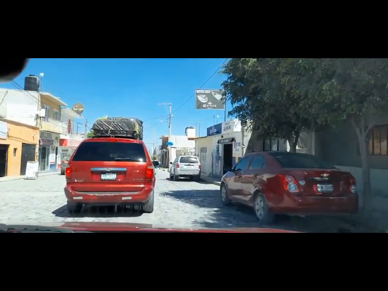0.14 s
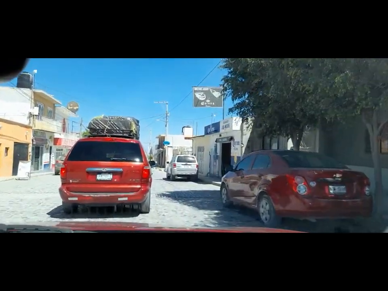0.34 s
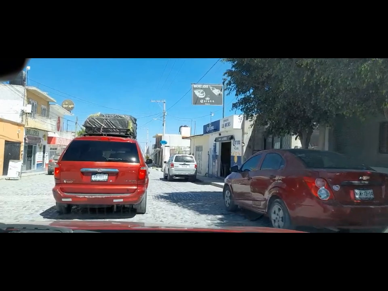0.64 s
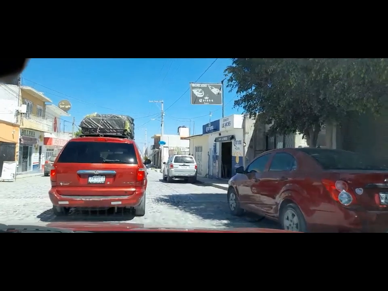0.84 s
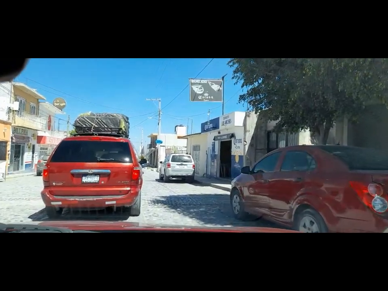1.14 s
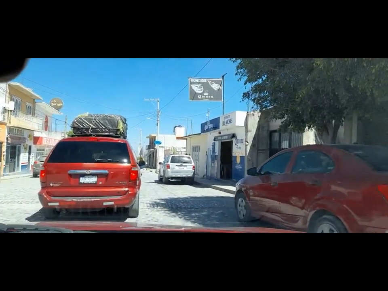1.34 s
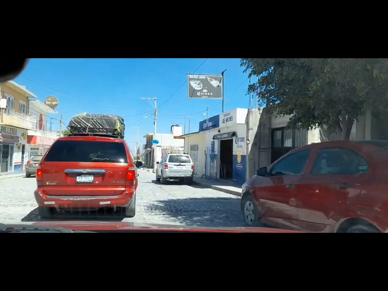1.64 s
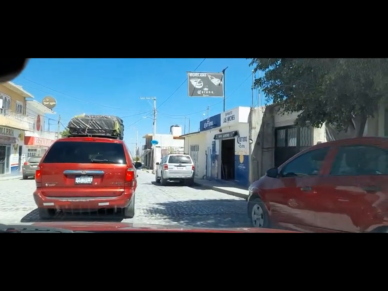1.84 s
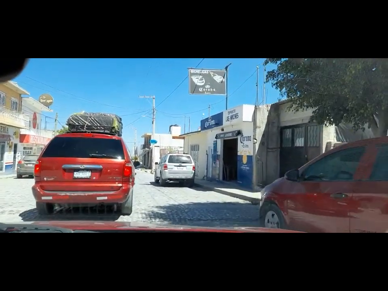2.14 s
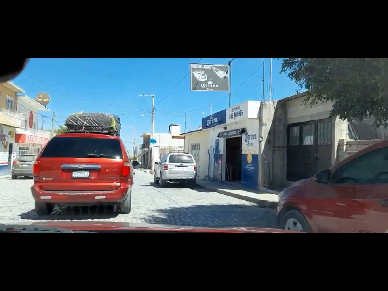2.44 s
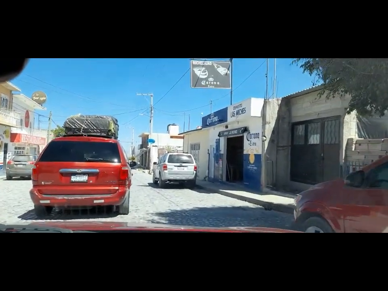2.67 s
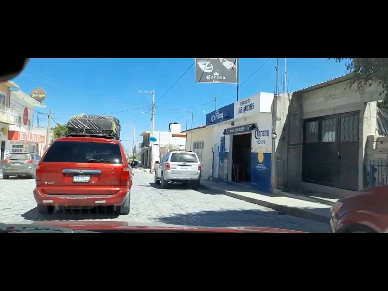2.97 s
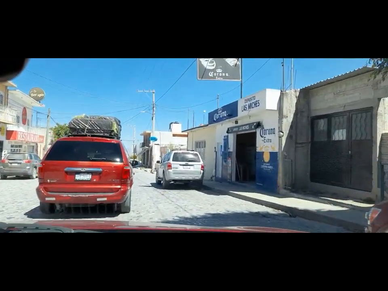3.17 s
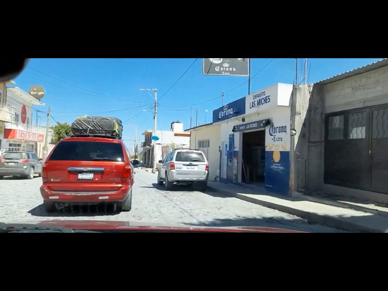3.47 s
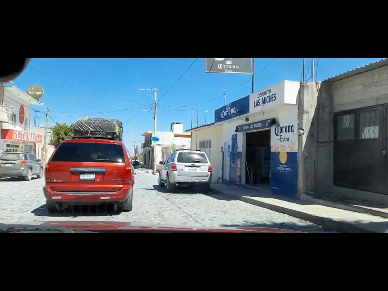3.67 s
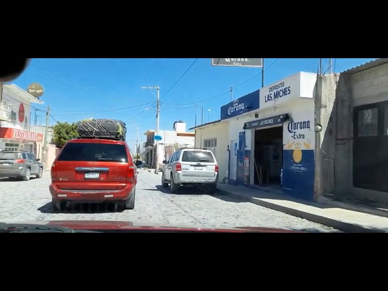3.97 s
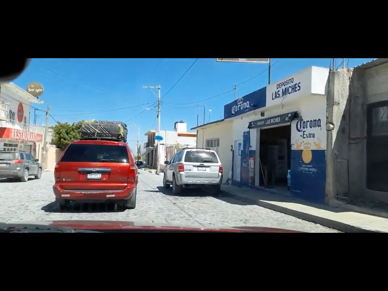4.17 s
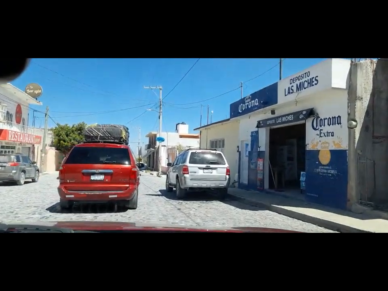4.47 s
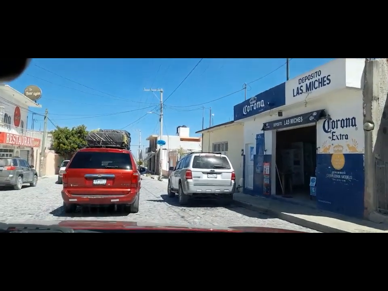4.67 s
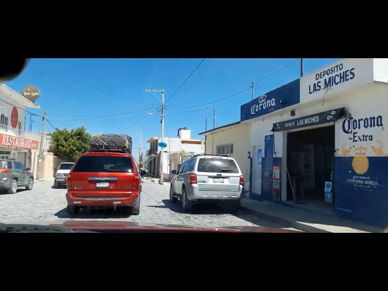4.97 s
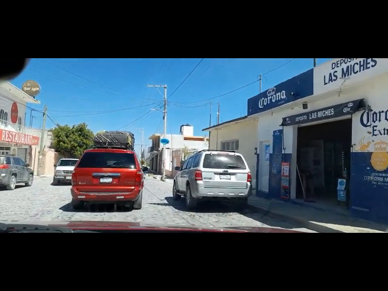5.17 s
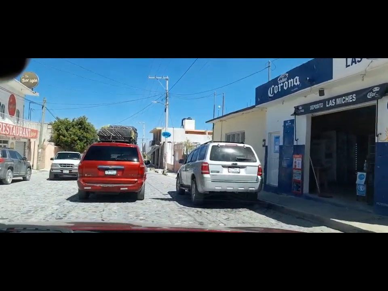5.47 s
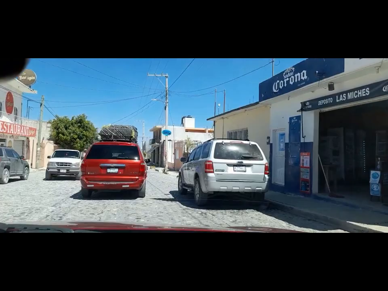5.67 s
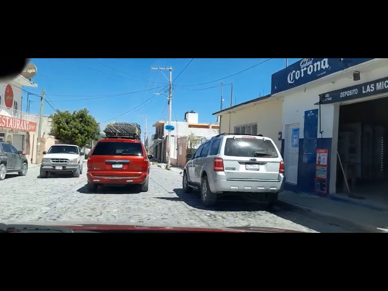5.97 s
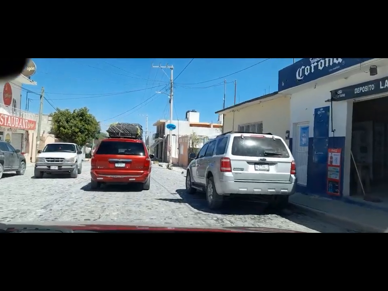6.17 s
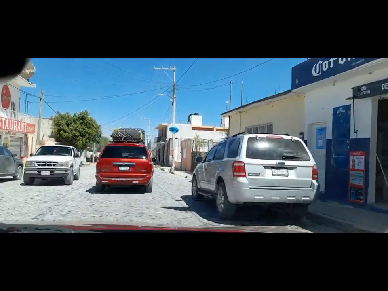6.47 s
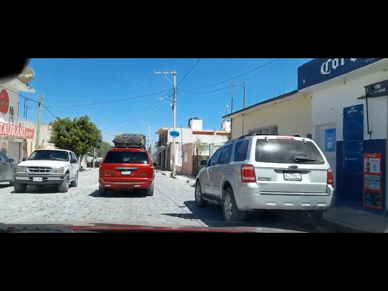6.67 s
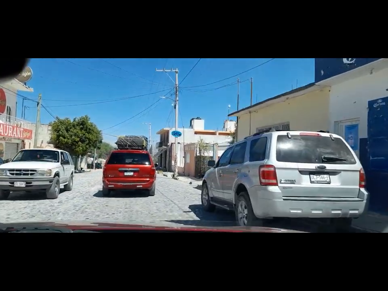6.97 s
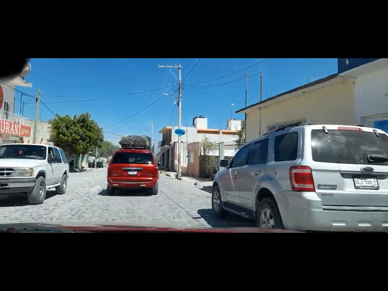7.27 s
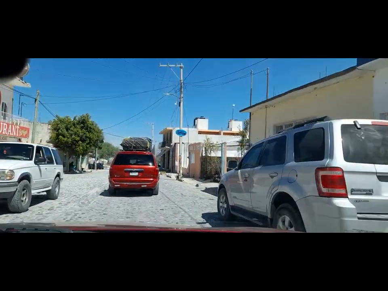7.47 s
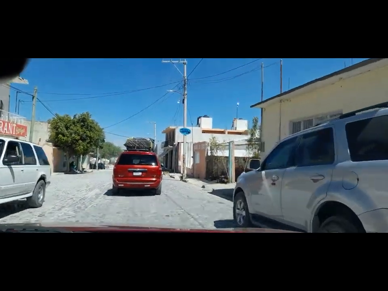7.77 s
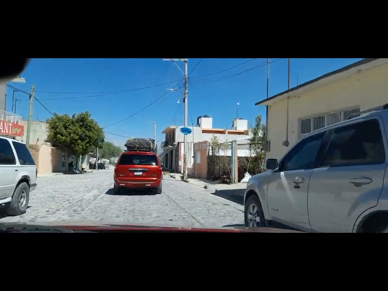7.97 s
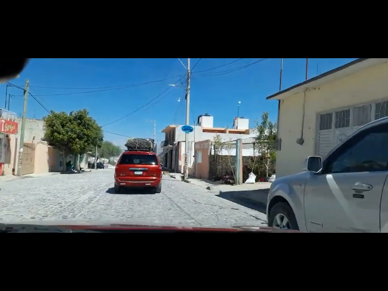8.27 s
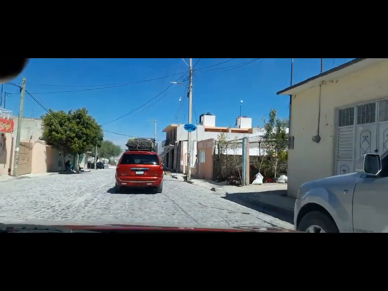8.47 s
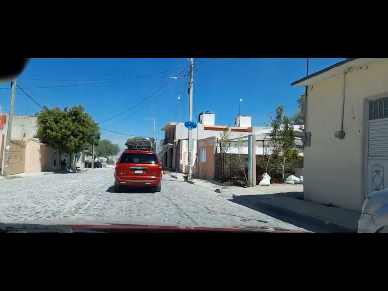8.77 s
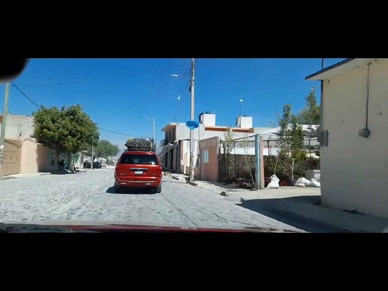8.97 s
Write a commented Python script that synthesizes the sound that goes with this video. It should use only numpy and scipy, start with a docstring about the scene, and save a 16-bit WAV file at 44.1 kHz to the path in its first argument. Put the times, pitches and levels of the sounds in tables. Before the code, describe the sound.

Inside a car rolling slowly over cobblestones, heard from the front seat. Throughout, a deep, bass-heavy drumming fills the cabin, with softer tyre roar, tiny trim chatter and faint hiss. A loose panel on the right knocks irregularly, clearly at 0.8 s; soft low bumps follow until 1.1. From about 1.2 to 2.4 s the engine growls and its low boom climbs in pitch, then lets go. Small knocks cluster around 3.0-3.3, and a second engine swell runs from 3.3 to 4.3. The rolling then calms. Around 5.7-6.1 several thuds arrive with gritty crunches and rattling. A strong panel knock at 7.2 leads into rougher jolts, plastic ticks on the left and sliding rustles. The hardest thump, with crunch and brief scrape, comes near 8.2. From 8.5 to the end at about 9 s, faint wavering squeaks and a rising rasp join the strong rumble.

```python
"""Inside a car rolling slowly over cobblestones. The stones drum through the suspension into the cabin,
a loose panel knocks, and plastic trim ticks and rustles on the jolts: ringing modes and short noise bursts.
The driver presses the pedal twice, so engine tones and noise puffs boom and growl briefly;
grainy noise crunches as grit under the tyres, and thin wavering tones make a faint squeal at the end."""
import sys
import numpy as np
from scipy import signal
from scipy.fft import rfft, irfft
from scipy.io import wavfile
from scipy.ndimage import uniform_filter1d

SR = 44100
rng = np.random.default_rng(int(sys.argv[2]) if len(sys.argv) > 2 else 0)


def unload_wav(signal):
    """Save mono or channel-first audio to the path in sys.argv[1] as 16-bit WAV at rate SR, clipped to [-1, 1]."""
    wavfile.write(
        sys.argv[1],
        SR,
        np.round(np.clip(np.atleast_2d(signal).T, -1, 1) * 32767).astype(np.int16),
    )


N = 402191
T, HZ = np.arange(N) / SR, np.fft.rfftfreq(N, 1 / SR)

# Levels in the colour tables only set the balance between pitches; each layer gets its loudness later.
# how alike left and right are: pitch_hz, likeness (1 same, 0 unrelated, -1 opposite)
LIKENESS = [(35, 1), (70, 0.75), (130, 0.99), (290, 0.61), (600, 0.28), (1200, -0.29), (3000, 0.068)]
# how much louder the left is than the right: pitch_hz, difference_db
LEFT_LEAN = [(30, 5), (70, 1.5), (140, -1), (300, 3), (550, 0), (1200, 1), (4300, 5), (7000, 13),
             (12000, 1.5)]
# steady hiss: pitch_hz, level_db (per Hz)
HISS_COLOUR = [(300, -7), (1000, 17), (2150, 1.5), (2700, -12.5), (5800, -4), (8300, -7.5), (11500, -1.5),
               (15500, -2)]
# chatter of tiny contacts: pitch_hz, level_db (per Hz)
CHATTER_COLOUR = [(900, -5), (2100, 3), (2750, -6), (3900, -4), (5900, -3.5), (6800, -9), (8300, -35),
                  (11500, -14.5), (15500, -16.5)]
# jolts that shake the whole dashboard: middle_s, length_s, rattle_db, rustle_db
JOLTS = [(2.698, 0.16, -54, -92), (6.066, 0.1, -50.5, -64), (7.375, 0.24, -52, -67.5),
         (7.628, 0.27, -58, -64), (7.875, 0.37, -53, -71.5), (8.21, 0.18, -54, -62.5)]
# rattle of the jolts, also used for the scrape: pitch_hz, level_db (per Hz)
JOLT_COLOUR = [(200, -12), (340, 4.5), (600, -8), (1200, -12.5), (2000, -14), (3000, -24.5), (6000, -28),
               (8000, -50.5)]
# thin, high rustles of something sliding by itself: middle_s, length_s, level_db
RUSTLES = [(0.51, 0.12, -59), (1.55, 0.48, -68), (2.27, 0.15, -66), (6.6, 2.1, -73), (9.05, 0.093, -63)]
# rustling: pitch_hz, level_db (per Hz)
RUSTLE_COLOUR = [(3000, -17.5), (6000, -3.5), (8300, -21), (10000, -7.5), (12000, -5.5), (15500, -9.5)]
# weak tones that join under the squeal: pitch_hz, level_db, join_s
WHINE_TONES = [(1050, -68.5, 8.83), (1105, -66.5, 8.64), (1338, -67, 8.84), (1468, -65.5, 9.0),
               (1615, -66, 8.97)]
# bursts of the high squeal: start_s, end_s, level_db (of the lower tone)
SQUEAL_BURSTS = [(8.552, 8.59, -66), (8.716, 8.75, -67.5), (8.822, 8.885, -66), (8.9, 8.94, -63),
                 (8.955, 8.995, -68.5), (9.008, 9.065, -64)]
# the two squeal tones: low_hz, high_hz
SQUEAL_PAIR = (1752, 1855)
# grit crunching under a tyre: start_s, level_db
CRUNCHES = [(2.703, -60), (4.163, -57.5), (5.995, -47), (6.058, -50), (7.327, -49), (7.41, -51),
            (7.797, -56), (8.131, -42.5)]
# grit: pitch_hz, level_db (per Hz)
GRIT_COLOUR = [(450, 2.5), (900, 1), (2200, -8), (2900, -18)]
# ticks of plastic trim: start_s, level_db, centre_hz (of the blow), spread_octaves
TICKS = [(0.589, -54, 5100, 0.37), (1.222, -48.5, 5800, 0.56), (2.025, -57, 2600, .7),
         (2.663, -58.5, 5000, 0.83), (5.173, -52.5, 5850, .13), (6.205, -56.5, 2370, .2),
         (7.583, -51.5, 13800, .25), (7.648, -49.5, 4800, 0.76), (8.011, -47.5, 4500, .4),
         (8.132, -54, 3600, .9), (8.216, -53, 6100, .15)]
# ringing modes of the trim: pitch_hz
TRIM_MODES = [2156, 2430, 2800, 3540, 4970, 5340, 5540, 5900, 6370, 11800, 13250]
# knocks of the loose panel, before a shared boost: time_s, level_db
KNOCKS = [(0.107, -42), (0.467, -40.5), (0.81, -28.5), (1.067, -39.5), (1.783, -41), (1.883, -40.5),
          (2.977, -41), (3.081, -33), (3.174, -36.5), (3.255, -36.5), (3.348, -39.5), (4.914, -40),
          (5.162, -38), (5.401, -38.5), (6.024, -43.5), (6.377, -33), (6.652, -37), (6.878, -43.5),
          (7.155, -27)]
# band of the dull clack of contact: low_hz, high_hz
CLACK_BAND = (250, 900)
# panel modes, before a small random detuning: pitch_hz, level_db, fade_s (to fall 60 dB)
PANEL_MODES = [(340, -1.5, 0.1), (465.3, -8, 0.14), (540, 4, 0.055), (710, -10.5, 0.015),
               (1040, -11.5, 0.043), (1310, -23, 0.05)]
# engine speed: time_s, firing_rate_hz
ENGINE_SPEED = [(1.25, 44.5), (1.4, 47.07), (1.64, 54.7), (1.92, 61.84), (2.07, 66), (2.2, 72.5),
                (2.39, 79.16), (2.5, 74.83), (3.32, 56.9), (3.6, 62.56), (3.94, 66.22), (4.09, 70.74),
                (4.28, 74), (4.4, 70.7)]
# presses of the pedal: down_s, up_s, growl_db, boom_db, intake_hiss_db
PRESSES = [(1.236, 2.369, -41, -22, -72), (3.32, 4.254, -41.5, -22.5, -80)]
# exhaust tones: order (multiple of the firing rate), level_db
EXHAUST_ORDERS = [(1, 5), (2, -12.5), (3, -21), (4, -27.5), (5, -26), (6, -26.5), (7, -28)]
# cabin resonances that the exhaust tones sweep through: pitch_hz, gain_db
CABIN_GAIN = [(45, -2.5), (54, -9.5), (64, -3), (78, -1), (100, -7), (125, -7), (145, 6.5), (170, -11.5),
              (200, -1.5), (330, -1.5), (370, -11.5), (420, 3), (480, -2.5), (560, -10.5)]
# engine growl: pitch_hz, level_db (per Hz)
GROWL_COLOUR = [(130, -3.5), (220, -0.5), (300, 2), (375, -0.5), (440, 4.5), (520, -4.5), (640, -14.5),
                (820, -11.5), (950, -24), (2400, -33.5)]
# wheels dropping off high stones: start_s, level_db, hardness_db_per_octave
BUMPS = [(0.822, -15, -9.5), (1.024, -20.5, -1.5), (1.135, -14, -13), (5.724, -20, -5.5),
         (5.945, -18.5, -4), (6.01, -29, 3.5), (6.056, -24.5, 5.5), (6.088, -20.5, 0), (7.312, -15.5, -4),
         (7.79, -26, 4.5), (8.175, -22, 4), (8.247, -11.5, -1), (8.323, -18, -8.5)]
# chassis modes, before random detuning: pitch_hz, level_db, fade_s (to fall 60 dB)
CHASSIS_MODES = [(57.7, 5.5, 0.2), (81.6, -0.5, 0.36), (130.6, -1.5, 0.24), (234, -6.5, 0.097),
                 (333, -12.5, 0.1), (403, -20, 0.074)]
# how hard the stones shake the car; boom, tyre roar and chatter follow it: time_s, level_db
ROUGHNESS = [(0, 3.5), (0.55, -1.5), (1.18, 2), (1.28, -2), (1.45, 0.5), (2.4, -2.5), (2.9, -2),
             (4.7, -0.5), (5.27, -3.5), (5.9, -0.5), (7.15, 1), (7.45, 3.5), (8.03, 2.5), (8.36, 5),
             (8.51, 2.5), (9.05, 5)]
# drumming body: pitch_hz, level_db (per Hz)
BOOM_COLOUR = [(20, -32), (26, -21.5), (31, -5.5), (38, -2.5), (50, 2), (62, 1), (78, 2), (100, -2),
               (135, -6.5), (165, -18.5), (260, -26)]
# roaring tyres: pitch_hz, level_db (per Hz)
ROAR_COLOUR = [(150, -11), (183, -1), (210, -10.5), (270, -9.5), (326, -8), (380, -14), (450, -14),
               (560, -19), (640, -26), (800, -27), (1280, -38), (2150, -44), (2750, -58)]

# the growl answers the pedal first, the boom builds after it
GROWL_RISE_S, BOOM_RISE_S, RELEASE_S = 0.087, 0.34, 0.15


def gain_of(db):
    """Turns decibels into amplitude."""
    return 10 ** (np.asarray(db) / 20)


def evened(x):
    """Scales a sound to an average strength (rms) of 1."""
    return x / np.sqrt(np.mean(x ** 2) + 1e-20)


def read(points):
    """Reads a table at every frequency, joining its points on a log axis."""
    hz, value = np.transpose(points)
    return np.interp(np.log(HZ + 1), np.log(hz + 1), value)


def coloured(x, points, skirt_db=30):
    """Filters by a table that falls by skirt_db an octave beyond its ends, then evens the result."""
    inside_hz = np.clip(HZ + 1, points[0][0], points[-1][0])
    octaves_outside = abs(np.log2((HZ + 1) / inside_hz))
    return evened(irfft(rfft(x) * gain_of(read(points) - skirt_db * octaves_outside), N))


def noise():
    """Unrelated white noise for two channels."""
    return rng.standard_normal((2, N))


def wander(rate_hz):
    """Slow random drift with an rms of 1."""
    t = np.arange(N // 32 + 1) * 32 / SR  # coarse steps are enough for a slow drift
    hz = np.fft.rfftfreq(len(t), t[1])
    spectrum = rfft(rng.standard_normal(len(t))) / (1 + (hz / rate_hz) ** 4)
    return evened(np.interp(T, t, irfft(spectrum, len(t))))


def panned(db):
    """Left and right gains that make the left louder by db."""
    return gain_of(np.array([[.5], [-.5]]) * db)


def cabin(pair):
    """Blends two unrelated signals into a field with the cabin's likeness and lean between the sides."""
    a, b = rfft(pair)
    same = np.clip(read(LIKENESS), -1, 1)
    mid, side = np.sqrt(1 + same) * a, np.sqrt(1 - same) * b
    return irfft(np.array([mid + side, mid - side]) * panned(read(LEFT_LEAN)), N)


def add(mix, s, sound):
    """Mixes a sound in at a time in seconds."""
    part = mix[..., max(round(s * SR), 0):][..., :sound.shape[-1]]
    part += sound[..., :part.shape[-1]]


def patter(per_s, spread_db, t60):
    """Envelope of random blows of uneven size, each falling 60 dB in t60 seconds."""
    sizes = gain_of(spread_db * np.minimum(rng.exponential(1, N), 4))
    blows = sizes * (rng.random(N) < per_s / SR)
    power = signal.lfilter([1], [1, -gain_of(-120 / (t60 * SR))], blows ** 2)
    return evened(np.sqrt(power))


def swells(rows):
    """Envelope of soft-edged bursts."""
    return sum(gain_of(db) * np.exp(-abs(2 * (T - s) / length) ** 3 * 2) for s, length, db in rows)


def shaking(follow):
    """Gain of a layer that follows the roughness of the road by this many dB per dB."""
    return gain_of(follow * np.interp(T, *np.transpose(ROUGHNESS)))


def pedal(down, up, rise_s):
    """Engine load from 0 to 1: it builds, holds and lets go."""
    return np.clip((T - down) / rise_s, 0, 1) * np.clip(1 - (T - up) / RELEASE_S, 0, 1)


def thin_tone(hz):
    """A wavering, fluttering tone that reaches the two sides out of step."""
    waver_hz, flutter_db = 13, 3
    turns = np.cumsum(hz + waver_hz * wander(25)) / SR + rng.random((2, 1)) / 4
    return np.sqrt(2) * np.cos(2 * np.pi * turns) * gain_of(flutter_db * wander(60))


def fittings():
    """Tiny contacts chatter with road and engine, rattle on jolts and rustle as they slide, over a hiss."""
    chatter_db, chatter_follow, hiss_db, buzz_db = -69.0, 0.94, -68.0, -73
    unrest, rustle_flutter = 0.48, .15  # shares of the level that vary
    contacts = evened(1 - unrest + unrest * patter(per_s=110, spread_db=3.3, t60=0.1))
    chatter = coloured(cabin(noise() * contacts), CHATTER_COLOUR)
    rattle = coloured(cabin(noise() * patter(per_s=600, spread_db=1.5, t60=0.04)), JOLT_COLOUR)
    rustle = coloured(noise() * (1 + rustle_flutter * wander(60)), RUSTLE_COLOUR) * panned(1.5)
    buzz = gain_of(buzz_db) * sum(pedal(down, up, GROWL_RISE_S) for down, up, *_ in PRESSES)
    drive = np.hypot(gain_of(chatter_db) * shaking(chatter_follow), buzz)
    jolts = swells((s, length, db) for s, length, db, _ in JOLTS)
    sliding = swells(RUSTLES) + swells((s, length, db) for s, length, _, db in JOLTS)
    hiss = gain_of(hiss_db) * coloured(noise(), HISS_COLOUR)
    return chatter * drive + rattle * jolts + rustle * sliding + hiss


def whine():
    """Faint thin tones join one by one under the squeal, while a noisy rasp swells."""
    join_s, rasp_db, rasp_db_per_s, rasp_full_s = .04, -58, 35, 9.15
    tones = sum(thin_tone(hz) * gain_of(db) * np.clip((T - join) / join_s, 0, 1)
                for hz, db, join in WHINE_TONES)
    rasp = coloured(cabin(noise()), CHATTER_COLOUR)
    return tones + rasp * gain_of(rasp_db - rasp_db_per_s * np.maximum(rasp_full_s - T, 0))


def squeal():
    """Something rubs, catches and lets go: each burst sings on a close pair of tones."""
    attack_s, release_s, upper_db = 0.0067, .016, -2
    bursts = np.zeros(N)
    for start, end, db in SQUEAL_BURSTS:
        fade_in = np.clip((T - start) / attack_s, 0, 1)
        fade_out = np.clip(1 - (T - end) / release_s, 0, 1)
        bursts += gain_of(db) * fade_in * fade_out
    low, high = (thin_tone(hz) for hz in SQUEAL_PAIR)
    return (low + gain_of(upper_db) * high) * bursts


def scrape():
    """A tyre scrapes off a stone's side in many small jerks, swelling to a peak and dying away."""
    peak_s, peak_db, rise_db_per_s, fall_db_per_s = 8.216, -43, 130, 150
    slips = coloured(cabin(noise() * patter(per_s=400, spread_db=1.5, t60=.04)), JOLT_COLOUR)
    below_db = np.maximum(rise_db_per_s * (peak_s - T), fall_db_per_s * (T - peak_s))
    return slips * gain_of(peak_db - below_db)


def grit():
    """Grit breaks under the tyres in short, grainy crunches."""
    crunch_t60 = .075  # seconds to fall 60 dB
    grains = coloured(cabin(noise() * patter(per_s=500, spread_db=3, t60=.012)), GRIT_COLOUR)
    t, crunches = np.arange(SR // 2) / SR, np.zeros(N)
    for s, db in CRUNCHES:
        add(crunches, s, gain_of(db - 60 * t / crunch_t60))
    return grains * crunches


def ticks():
    """Trim on the left snaps: a short crack, and the modes ring that lie near the centre of the blow."""
    ring_t60, crack_t60, crack = .042, 0.037, 0.58  # s, s, share of the ring
    t, out = np.arange(SR // 5) / SR, np.zeros((2, N))
    hz, mode_hz = np.fft.rfftfreq(len(t), 1 / SR) + 1, np.array(TRIM_MODES)[:, None]
    for s, db, centre_hz, spread in TICKS:
        def reach(f):
            """How strongly the blow excites a frequency."""
            return np.exp(-(np.log2(f / centre_hz) / spread) ** 2 / 2)
        phase = rng.random((2, len(mode_hz), 1))
        modes = reach(mode_hz) * np.sin(2 * np.pi * (mode_hz * t + phase))
        ring = evened(modes.sum(1)) * gain_of(-60 * t / ring_t60)
        plastic = np.interp(hz, HZ, gain_of(read(CHATTER_COLOUR))) * np.sqrt(reach(hz))
        snap = evened(irfft(rfft(rng.standard_normal((2, len(t)))) * plastic, len(t)))
        snap *= gain_of(-60 * t / crack_t60)
        add(out, s, (ring + crack * snap) * gain_of(db))
    return out * panned(7)


def knocks():
    """The panel, to the right, strikes and bounces once, fuller when struck harder, with a short cabin tail."""
    boost_db, bright_db, bounce_s, bounce = 2.0, 0.8, .009, 0.44
    clack_db, clack_t60, tail_db, tail_t60 = -15, 0.0098, -19, 0.087
    left_lag_s, contact_s = 0.00034, .0015  # the left hears it later; the contact is soft
    t, out = np.arange(SR // 5) / SR, np.zeros((2, N))
    # between its knocks the panel taps faintly at random
    faint = [(s, -48) for s in rng.uniform(0, N / SR, size=6)]
    hardest_db = max(db for _, db in KNOCKS)
    clack_filter = signal.butter(2, CLACK_BAND, "bandpass", fs=SR)
    for s, db in list(KNOCKS) + faint:
        tilt_db = bright_db * (db - hardest_db)
        ring = np.zeros(len(t))
        for hz, level, t60 in PANEL_MODES:
            detuned_hz = hz * (1 + .008 * rng.standard_normal())
            octaves_off = abs(np.log2(hz / PANEL_MODES[2][0]))
            ring += gain_of(level + tilt_db * octaves_off - 60 * t / t60) * np.sin(2 * np.pi * detuned_hz * t)
        ring *= 1 - np.exp(-t / contact_s)
        clack = evened(signal.lfilter(*clack_filter, rng.standard_normal(len(t))))
        clack *= gain_of(clack_db + tilt_db - 60 * t / clack_t60)
        knock = (ring + clack) * gain_of(db + boost_db)
        echoes = rng.standard_normal((2, len(t))) * gain_of(tail_db - 60 * t / tail_t60) / np.sqrt(SR / 1000)
        for channel, delay in enumerate([left_lag_s, 0]):
            start = s - contact_s + delay
            tail = signal.fftconvolve(knock, echoes[channel])[:len(t)] / 2
            add(out[channel], start, knock + tail)
            add(out[channel], start + bounce_s, bounce * knock)
    return out


def intake():
    """Air hisses past the open throttle."""
    air = coloured(cabin(noise()), [(3400, 0), (5000, -3)], skirt_db=23.0)  # pitch_hz, level_db
    return air * sum(gain_of(db) * pedal(down, up, BOOM_RISE_S) for down, up, *_, db in PRESSES)


def engine(down, up, growl_db, boom_db):
    """Firings give exhaust tones; four unequal cylinders and their puffs growl through the bulkhead."""
    # shares: speed drift, firings early or late, uneven strength, flutter of the higher orders
    waver, jitter, unrest, flutter = 0.0053, .014, .1, .08
    half_order, quarter_order, puff_db = 0.63, 0.58, -4
    hz = np.interp(T, *np.transpose(ENGINE_SPEED))
    turns = np.cumsum(hz * (1 + waver * wander(14))) / SR + jitter * wander(22)  # counts firings
    exhaust = np.zeros(N)
    for order, db in EXHAUST_ORDERS:
        k = round(order)
        gain = np.sqrt(2) * gain_of(db + np.interp(k * hz, *np.transpose(CABIN_GAIN)))
        tone = gain * np.cos(2 * np.pi * (k * turns + rng.random()))
        exhaust += tone * (1 + flutter * (order - 1) * wander(9.1))
    exhaust *= 1 + unrest * wander(1.7)
    # one cycle is four firings; unequal cylinders fill in the orders between
    cycle = np.linspace(0, 1, num=2048)
    weights = [1, quarter_order, half_order, quarter_order]
    orders = sum(weights[k % 4] * np.cos(2 * np.pi * (k * cycle + rng.random())) for k in range(10, 60))
    firings = evened(np.interp(turns / 4 % 1, cycle, orders))
    puffs = evened(0.23 + np.exp(-(turns % 1) / .3)) * noise()
    bay = coloured(cabin(np.array([firings, np.zeros(N)])), GROWL_COLOUR)
    bay += gain_of(puff_db) * coloured(cabin(puffs), GROWL_COLOUR)
    # a faster engine growls louder, by 5 dB an octave
    growl = evened(bay) * gain_of(growl_db + 5 * np.log2(hz / 74.4))
    boom = gain_of(boom_db) * pedal(down, up, BOOM_RISE_S)
    return exhaust * boom * panned(3.8) + growl * pedal(down, up, GROWL_RISE_S)


def bumps():
    """A deep blow rings the chassis; a harder one reaches its higher modes."""
    t, out = np.arange(SR // 2) / SR, np.zeros(N)
    for s, db, hardness_db in BUMPS:
        ring = np.zeros(len(t))
        for hz, level, t60 in CHASSIS_MODES:
            hardness = hardness_db * np.log2(hz / CHASSIS_MODES[0][0])
            tone = np.sin(2 * np.pi * hz * rng.uniform(0.86, 1.08) * t)
            soft_start = 1 - np.exp(-(2 * hz * t) ** 2)
            ring += gain_of(level + hardness - 60 * t / t60) * tone * soft_start
        add(out, s, ring * gain_of(db))
    return out * panned(2)


def road():
    """Stone after stone shakes the body; the rolling tyres roar and slap each one."""
    boom_db, roar_db, roar_follow, slap_share = -24.0, -41, 0.98, 0.42
    body = coloured(cabin(noise()), BOOM_COLOUR)
    # the dampers keep the shaking even from one stone to the next
    body /= uniform_filter1d((body ** 2).mean(0), size=9000) ** 0.2
    slaps = evened(1 - slap_share + slap_share * patter(per_s=63, spread_db=3.0, t60=0.17))
    tyres = coloured(cabin(noise() * slaps), ROAR_COLOUR)
    drumming = evened(body) * gain_of(boom_db) * shaking(1.0)
    return drumming + tyres * gain_of(roar_db) * shaking(roar_follow)


def scene():
    """Everything heard from the front seat."""
    background = fittings() + whine() + squeal() + scrape() + grit() + ticks() + knocks()
    motor = intake() + sum(engine(*press) for *press, hiss_db in PRESSES)
    return background + motor + bumps() + road()


def record(dry):
    """Removes the treble above 15800 Hz."""
    lowpass = signal.firwin(511, 15800, window=("kaiser", 9), fs=SR)
    return signal.oaconvolve(dry, lowpass[None], "same")


dry = scene()
out = record(dry)
unload_wav(out)
```